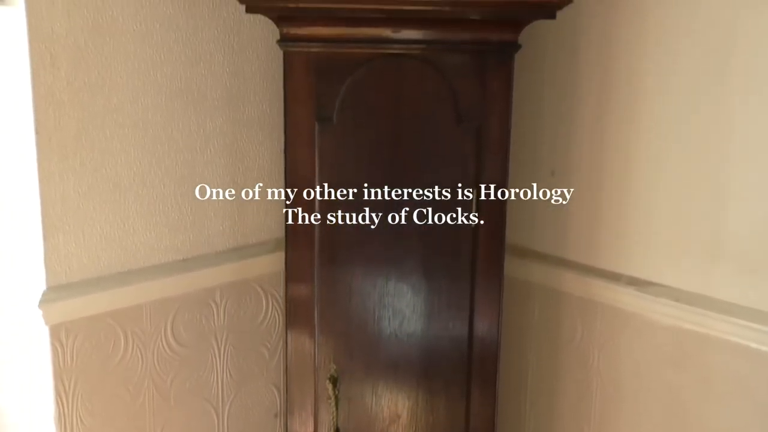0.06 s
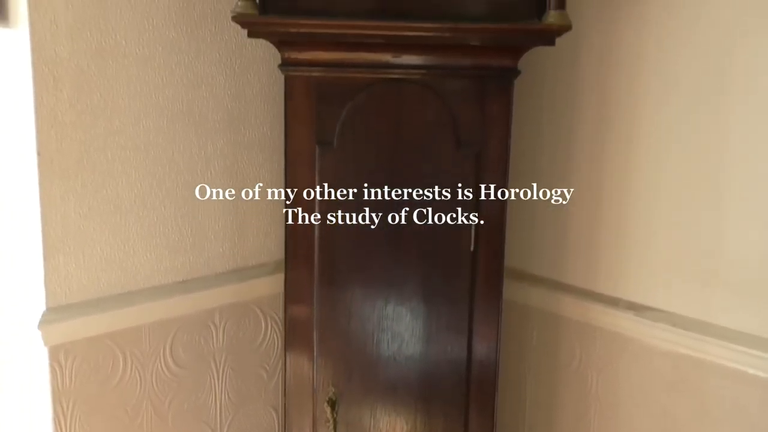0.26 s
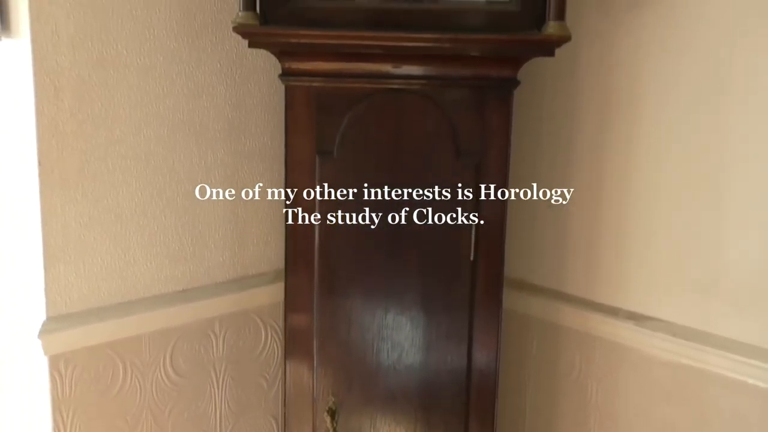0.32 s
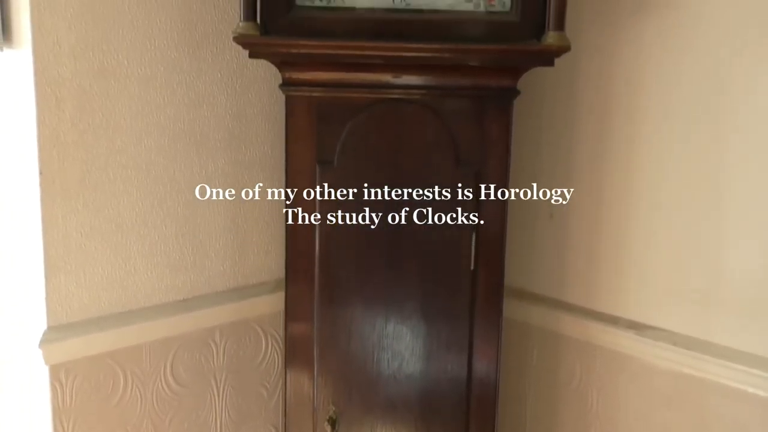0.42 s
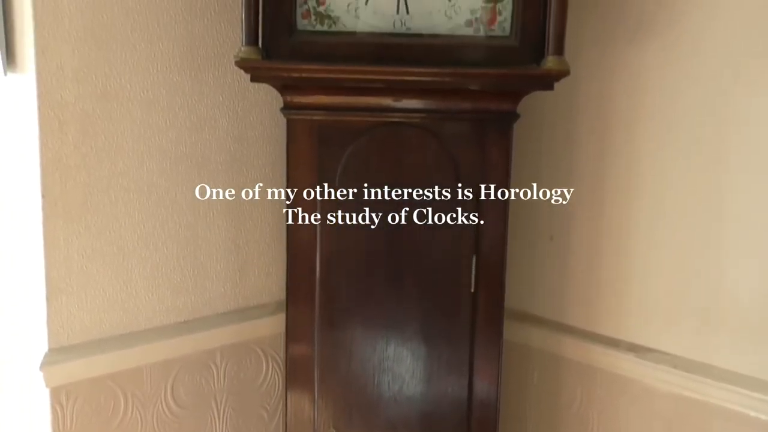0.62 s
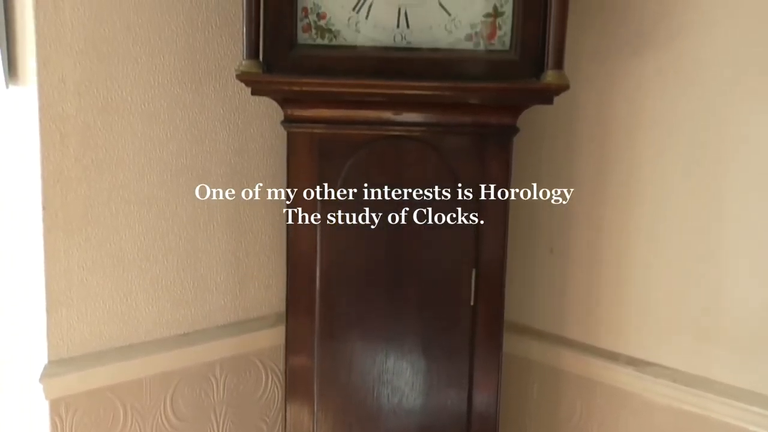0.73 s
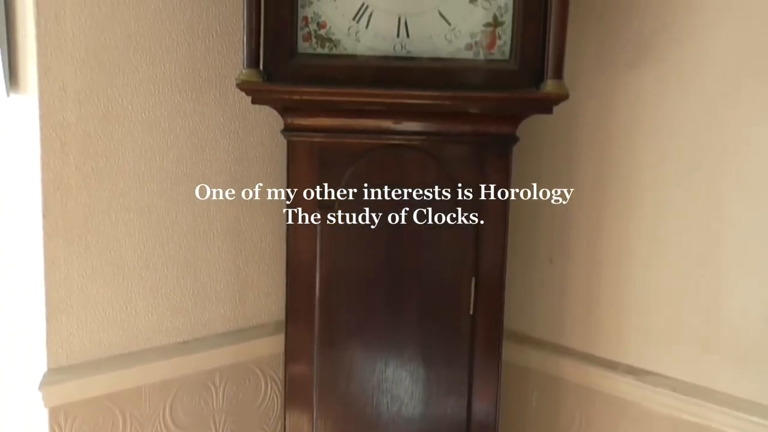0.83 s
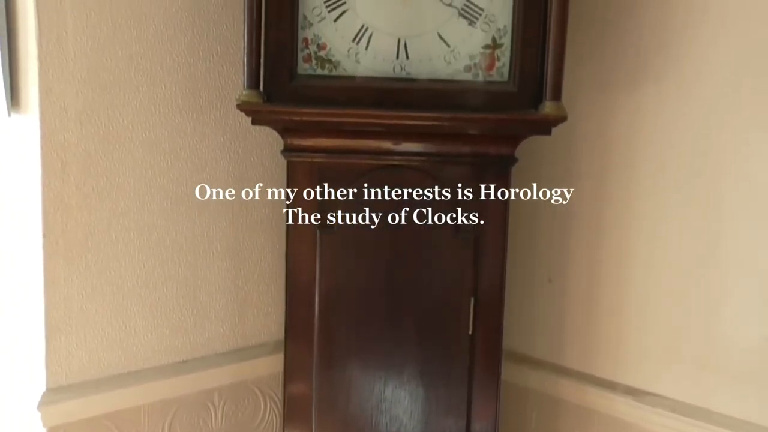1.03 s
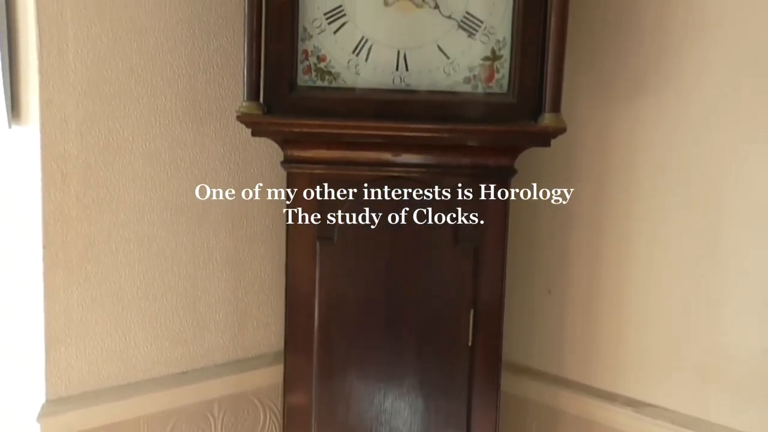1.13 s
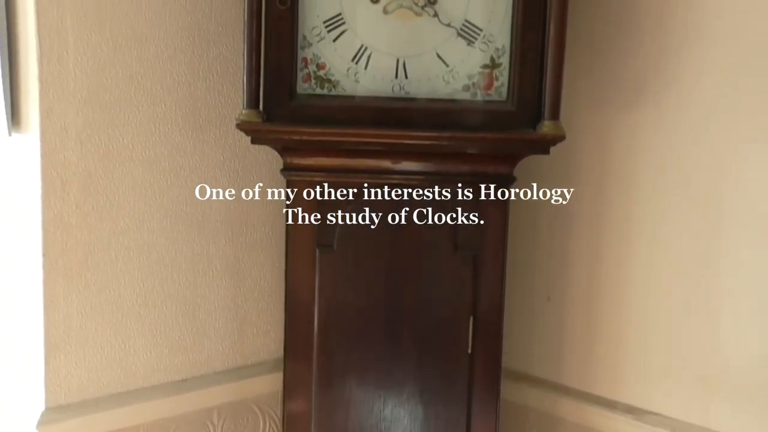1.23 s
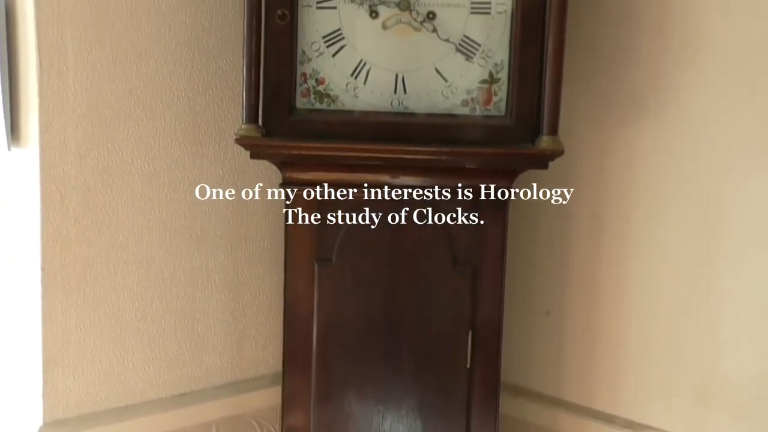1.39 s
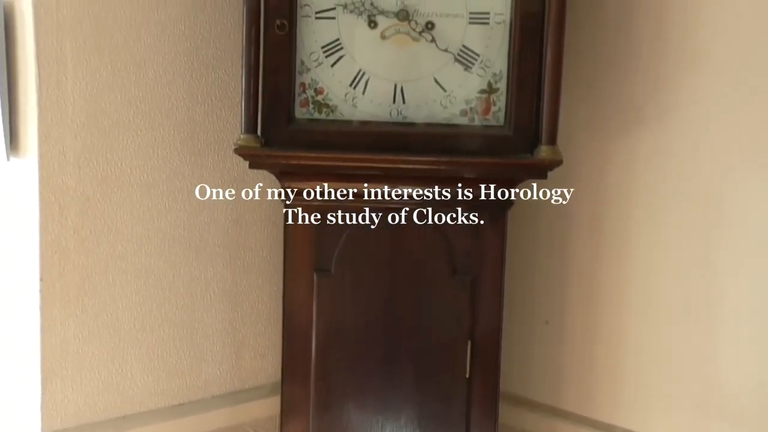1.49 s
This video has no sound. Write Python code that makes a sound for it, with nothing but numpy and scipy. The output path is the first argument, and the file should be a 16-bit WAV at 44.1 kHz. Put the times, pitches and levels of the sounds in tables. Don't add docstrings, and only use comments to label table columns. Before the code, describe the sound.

Clock bell struck once by a hammer, shimmering long in a quiet room with wooden lever knocks.

```python
import sys
import numpy as np
from scipy import signal
from scipy.fft import rfft, irfft, next_fast_len
from scipy.io import wavfile
from scipy.ndimage import uniform_filter1d

SR = 44100
rng = np.random.default_rng(int(sys.argv[2]) if len(sys.argv) > 2 else 0)


def rack_gain(trim_db):
    fader = np.asarray(trim_db, float)
    return 10 ** (fader / 20)


def wrap_up_sound(samples):
    columns = np.atleast_2d(samples).T
    tamed = np.clip(columns, -1, 1)
    steps = np.round(tamed * 32767).astype(np.int16)
    wavfile.write(sys.argv[1], SR, steps)


N = 68355
TOUCH_S, BLOW_S = 0.222, 0.2395


def at_hz(points, hz):
    table = np.array(points)
    return np.interp(np.log(hz), np.log(table[:, 0]), table[:, 1])


def drift(rate_hz):
    knots = rng.standard_normal(int(N / SR * rate_hz) + 4)
    return 1.47 * np.interp(np.arange(N) / SR * rate_hz, np.arange(len(knots)), knots)


def ring(push, hz, t60_s, pan_db=0., lead_rad=0.):
    pole = rack_gain(-60 / (t60_s * SR)) * np.exp(2j * np.pi * hz / SR)
    z = signal.lfilter([1], [1, -pole], push + 1e-18)
    left = rack_gain(pan_db / 2) * z.imag
    right = rack_gain(-pan_db / 2) * (z * np.exp(1j * lead_rad)).imag
    return np.array([left, right])


# frequency in Hz, left-right likeness from 0 to 1.
EAR_LIKENESS = [(40, 0.61), (300, 0.47), (1000, 0.26), (5000, 0.87), (15000, 0.34)]


def bands(spectrum, patchy_db, envelope=lambda hz: 1):
    octaves_down = np.arange(0, np.log2(spectrum[0][0] / 20000), -1 / 3)
    edges = 16500 * 2 ** octaves_down
    white = rng.standard_normal((2, 2, N))
    out, power = 0, 0
    for k, (high, low) in enumerate(zip(edges, edges[1:])):
        band = signal.butter(2, [low, high], "band", fs=SR, output="sos")
        mid, side = signal.sosfilt(band, white[k % 2])
        hz = np.sqrt(low * high)
        alike = np.clip(at_hz(EAR_LIKENESS, hz), 0, 1)
        gain = rack_gain(at_hz(spectrum, hz))
        power += gain ** 2 * (high - low) * 2 / SR
        pair = np.sqrt(1 + alike) * mid + np.sqrt(1 - alike) * side * [[1], [-1]]
        out = out + gain * rack_gain(patchy_db * drift(14)) * envelope(hz) * pair
    return out / np.sqrt(power)


def echoes(x):
    room_t60_s, wall_cut_hz = 0.2, 9200
    size = next_fast_len(N + SR)
    w = 2 * np.pi * np.arange(size // 2 + 1) / size
    dull = 1 / np.sqrt(1 + (w * SR / (2 * np.pi * wall_cut_hz)) ** 2)
    answer = np.zeros((2, len(w)), complex)
    lags = (rng.uniform(.008, .04, 16) * SR).astype(int)
    for k, lag in enumerate(lags):
        loop = rack_gain(-60 * lag / SR / room_t60_s) * dull * np.exp(-1j * w * lag)
        answer[k % 2] += loop / (1 - loop) * (-1) ** (k // 2)
    return irfft(rfft(x.mean(0), size) * answer, size)[:, :N]


# frequency in Hz, level in dB per Hz.
AIR_COLOUR = [(25, -17), (45, -16.5), (110, -5.5), (300, -3.5), (1300, -13.5), (3500, -29.5), (5800, -26.5),
              (9000, -28), (15000, -33)]


def room_air():
    return rack_gain(-56.5) * bands(AIR_COLOUR, 0.5)


# frequency in Hz, level in dB.
MOTOR_LINES = [(118.7, -70), (104.6, -64)]


def motors():
    t = np.arange(N) / SR
    hum = sum(rack_gain(db + 2.5 * drift(9.8)) * np.sin(2 * np.pi * hz * t) for hz, db in MOTOR_LINES)
    return hum * rack_gain(np.array([[-2.5], [2.5]]))


# time in seconds, level in dB.
WHIR_LEVEL = [(0, -54.5), (.045, -51.5), (.1, -55.5), (.16, -60.5), (.225, -59), (.4, -76.5)]
# frequency in Hz, level in dB per Hz.
WHIR_COLOUR = [(300, 2), (900, -11), (1700, 2.5), (2600, -21.5), (3400, -1.5), (5000, -3.5), (7000, -19),
               (12000, -23)]


def whir():
    level_db = np.interp(np.arange(N) / SR, *np.transpose(WHIR_LEVEL))
    return rack_gain(level_db) * bands(WHIR_COLOUR, 2.5)


PANEL_PITCH = {"door": 994, "hood": 1180, "trunk": 655, "plinth": 2150, "back": 2680}
# start in seconds, panel name, level in dB, time to fall 60 dB in seconds.
PANEL_HITS = [(.224, "hood", -41, .2), (.258, "hood", -46, .2), (.57, "hood", -53, .3),
              (.598, "trunk", -45, .2), (.553, "plinth", -56, .12), (.67, "door", -42, .18),
              (.712, "door", -46, .25), (.665, "trunk", -53, .12), (.83, "door", -43, .2),
              (.865, "door", -49, .16), (.824, "hood", -50, .12), (.83, "back", -51, .2),
              (.675, "plinth", -55, .12)]


def panels():
    width = int(0.0078 * SR)
    turn = 2 * np.pi * np.arange(width) / SR
    out = 0
    for start_s, name, db, t60_s in PANEL_HITS:
        hz, start = PANEL_PITCH[name], int(start_s * SR)
        push = np.zeros(N)
        push[start:start + width] = np.hanning(width) * np.cos(hz * turn) * 4 / width
        out = out + rack_gain(db) * ring(push, hz, t60_s, -1.8, .3)
    return out + rack_gain(-15) * echoes(out)


# start in seconds, level in dB,
# time to fall 60 dB in seconds, rattle pitch in Hz, rattle above the wood in dB.
LEVER_KNOCKS = [(0.221, -44.5, 0.21, 10160, 30), (0.223, -42.5, 0.25, 4910, 18), (.235, -59, 1, 65.2, 14.5),
                (0.551, -50.5, 0.17, 8700, 16), (0.593, -55.5, 0.15, 695, 14.5),
                (0.651, -54, 0.33, 5900, 14), (.672, -47.5, 0.55, 1200, 4.5), (.705, -58.5, 0.17, 5860, 15),
                (0.819, -56, 0.25, 6150, 22), (0.834, -49, 0.26, 4220, 7), (0.849, -60, 0.21, 9400, 13),
                (1.381, -58.5, .4, 4600, 1.5), (1.269, -64.5, 0.27, 5600, 10.5),
                (1.5, -64.5, 0.33, 5600, 6)]
# frequency in Hz, level in dB per Hz.
WOOD_COLOUR = [(45, -8.5), (400, -5), (1200, -7.5), (2500, -11.5), (5500, -17), (8000, -27), (12000, -29.5),
               (15000, -37.5)]


def knocks():
    rise_s, rattle_octaves = 0.015, 0.36
    t = np.arange(N) / SR
    shapes = []
    for start_s, db, t60_s, _, _ in LEVER_KNOCKS:
        rise = np.clip((t - start_s) / rise_s, 0, 1)
        fall_db = 60 * np.clip(t - start_s - rise_s, 0, None) / t60_s
        shapes.append(rack_gain(db - fall_db) * rise)

    def envelope(hz):
        power = 0
        for shape, (_, _, _, rattle_hz, rattle_db) in zip(shapes, LEVER_KNOCKS):
            nearness = np.exp(-.5 * (np.log2(hz / rattle_hz) / rattle_octaves) ** 2)
            power = power + (shape * rack_gain(rattle_db * nearness)) ** 2
        return np.sqrt(power)
    return bands(WOOD_COLOUR, 1.96, envelope)


def hammer(hz, early, in_step_s):
    blow_width_s = 0.0011
    t = np.arange(N) / SR
    swell = np.where(t < BLOW_S, np.clip(t - TOUCH_S, 0, None), 0)
    landing = np.clip(1 - np.abs(2 * (t - BLOW_S) / blow_width_s - 1), 0, None)
    push = early * swell / swell.sum() + (1 - early) * landing / landing.sum()
    return push * np.exp(2j * np.pi * hz * (t - in_step_s))


CLANG_PITCH = [8560, 8590, 8806, 8892, 9793, 10407, 10855, 10958, 11045, 11968, 12687, 13406, 14000, 14267]
# level in dB, time to fall 60 dB in seconds, left minus right in dB.
CLANG_MODES = [(-35, .3, -6), (-32.5, 0.18, -6), (-21, 0.16, 0), (-33, 0.25, -2.5), (-39, .22, -14),
               (-40, 0.2, -2), (-32.5, 0.23, -2), (-33.5, 0.15, 3), (-37, 0.18, -4.5), (-43.5, .25, 3),
               (-42.5, .28, -3.5), (-38, .28, 4), (-42.5, .25, 0.5), (-41, .28, 4.5)]


def clang():
    chance = rng.uniform(-1.2, 1, (len(CLANG_MODES), 2))
    dry = 0
    for hz, (db, t60_s, pan_db), (step, lead) in zip(CLANG_PITCH, CLANG_MODES, chance):
        mode = ring(hammer(hz, 1, step / hz), hz, t60_s, pan_db, 1.5 * lead)
        dry = dry + rack_gain(db) * mode * (1 + 0.4 * drift(70.3))
    return rack_gain(4.5) * (dry + rack_gain(-8.5) * echoes(dry))


PROMPT_PITCH = [3079, 4560, 4790, 6520]
# level in dB, time to fall 60 dB in seconds.
PROMPT_MODES = [(-29.5, 0.16), (-39.5, .2), (-33, .2), (-22.5, 0.28)]


def prompt_bell():
    modes = zip(PROMPT_PITCH, PROMPT_MODES)
    return sum(rack_gain(db) * ring(hammer(hz, 0.25, .236), hz, t60_s) for hz, (db, t60_s) in modes)


BELL_PITCH = [699.0, 705.4, 1731.5, 1769.8, 3071.8, 3081.9, 4634.0, 4684.1, 6454.5, 6516.9, 7755.8, 7765.9,
              9368.0, 15711.0]
# level in dB, time to fall 60 dB in seconds,
# left minus right in dB, how far the right ear leads in radians.
BELL_PARTIALS = [(-57.5, 27, -1.5, 0.56), (-48.5, 30, -2, 0.42), (-42.5, 25, 1.5, 0.3), (-53, 19, 4, -2),
                 (-36.5, 7.6, -5, 0.94), (-34.5, 8, -4, 1.0), (-41.5, 1.2, -13, 3.3), (-16, 3.63, 1.8, .07),
                 (-36.5, 1.42, 1.5, 0.98), (-23.5, 1.255, 1, 2.5), (-56.5, 0.88, -2.5, 1.3),
                 (-68, 1.4, 3.5, -2.5), (-60, 1.8, 0, 2.2), (-54, .4, 5.5, -6.5)]
LINGER_LEVELS = [-59, -48.5, -54, -65, -61, -75]


def bell():
    earlier_s = 4.71
    t = np.arange(N) / SR
    out = 0
    for hz, (db, t60_s, pan_db, lead_rad) in zip(BELL_PITCH, BELL_PARTIALS):
        out = out + rack_gain(db) * ring(hammer(hz, 0.33, .236), hz, t60_s, pan_db, lead_rad)
    still = np.clip((BLOW_S - t) / 0.02, 0, 1)
    for hz, db, (_, _, pan_db, lead_rad) in zip(BELL_PITCH, LINGER_LEVELS, BELL_PARTIALS):
        turn = 2 * np.pi * hz * (t + earlier_s)
        left = rack_gain(pan_db / 2) * np.sin(turn)
        right = rack_gain(-pan_db / 2) * np.sin(turn + lead_rad)
        out = out + still * rack_gain(db) * np.array([left, right])
    return out


def scene():
    background = room_air() + motors()
    movement = whir() + panels() + knocks()
    return background + movement + clang() + prompt_bell() + bell()


# low edge in Hz, high edge in Hz,
# loud partial in Hz, level against that partial in dB below which the band is lost.
MASKED_BANDS = [(5150, 5700, 4684, -41), (5700, 6330, 4684, -42), (6750, 7650, 6517, -29),
                (7900, 8350, 6517, -31), (14500, 15600, 13406, -9)]


def masked(x):
    hz, _, z = signal.stft(x, SR, nperseg=2048)
    power = np.mean(np.abs(z) ** 2, axis=0)
    for low, high, partial, db in MASKED_BANDS:
        band = (hz > low) & (hz < high)
        loud = power[np.abs(hz - partial) < 100].sum(0)
        z[:, band] *= power[band].sum(0) > rack_gain(2 * db) * loud
    return signal.istft(z, SR, nperseg=2048)[1][:, :N]


def top_cut(x):
    return signal.sosfilt(signal.butter(12, 15720, fs=SR, output="sos"), x)


def record(dry):
    limit_db, sense_s, release_db_per_s = -20.5, 0.024, 34.5
    power = uniform_filter1d(np.mean(dry ** 2, axis=0), int(sense_s * SR))
    level_db = 10 * np.log10(power + 1e-12)
    slope = release_db_per_s * np.arange(N) / SR
    over_db = np.maximum.accumulate(np.clip(level_db - limit_db, 0, None) + slope) - slope
    mix = masked(dry * rack_gain(-over_db))
    return top_cut(mix)


dry = scene()
out = record(dry)
wrap_up_sound(out)
```